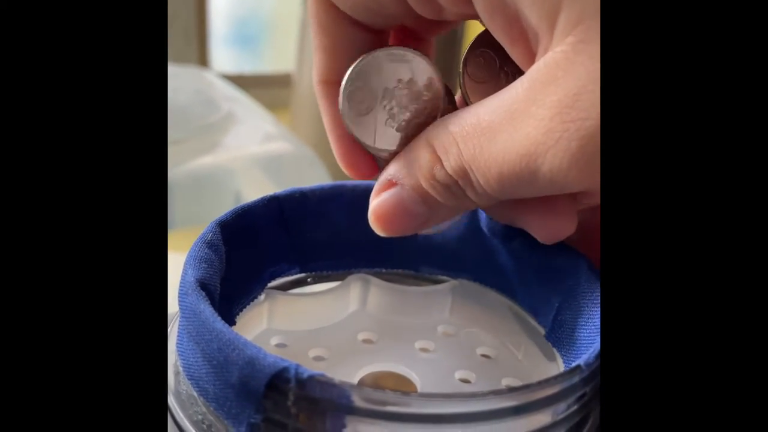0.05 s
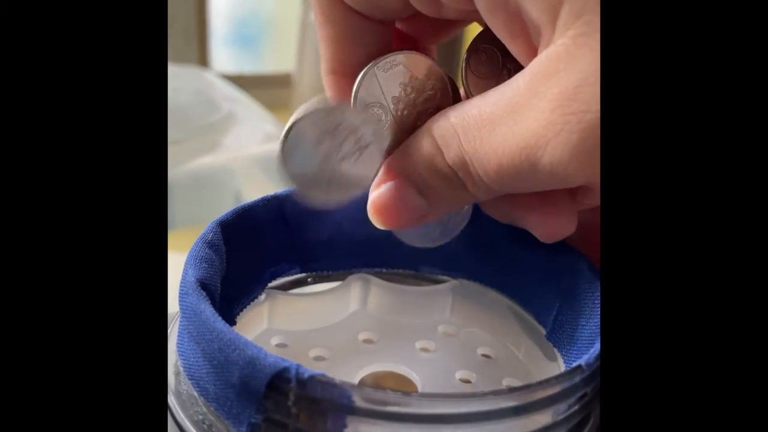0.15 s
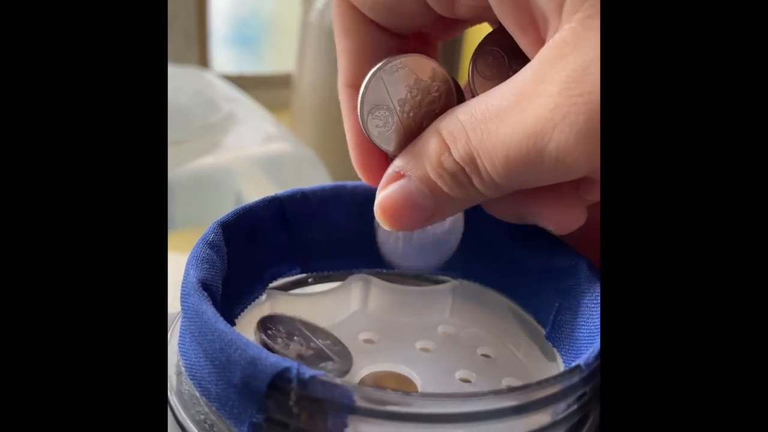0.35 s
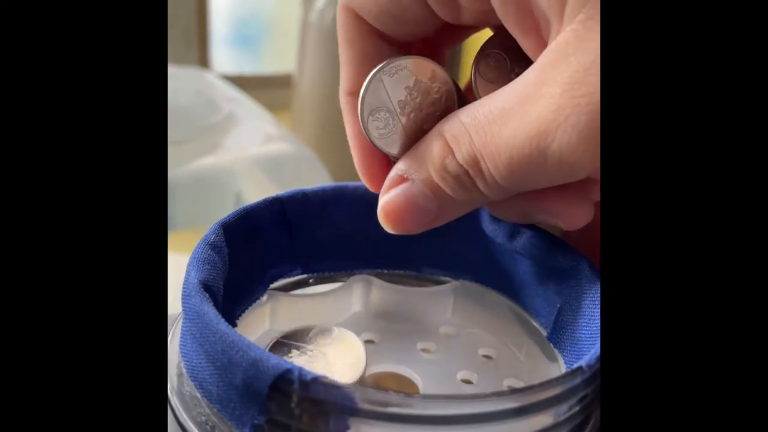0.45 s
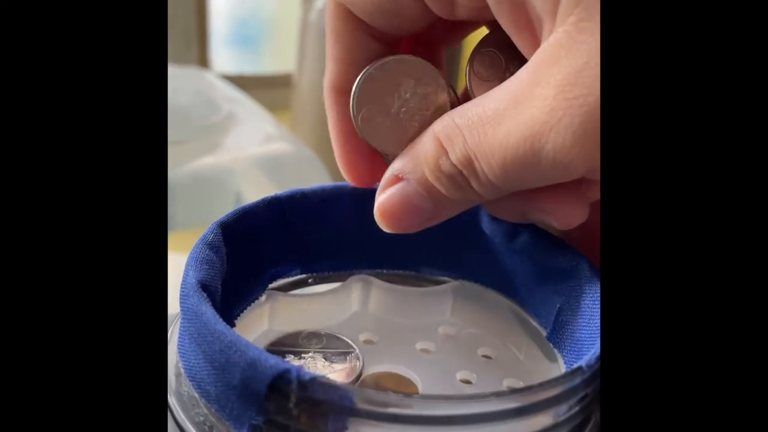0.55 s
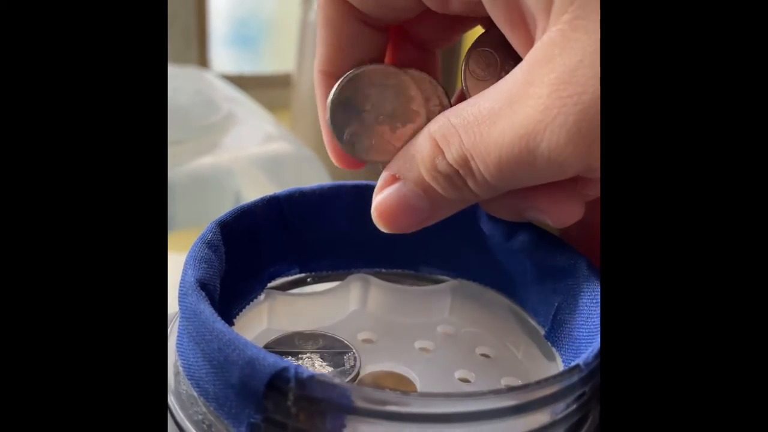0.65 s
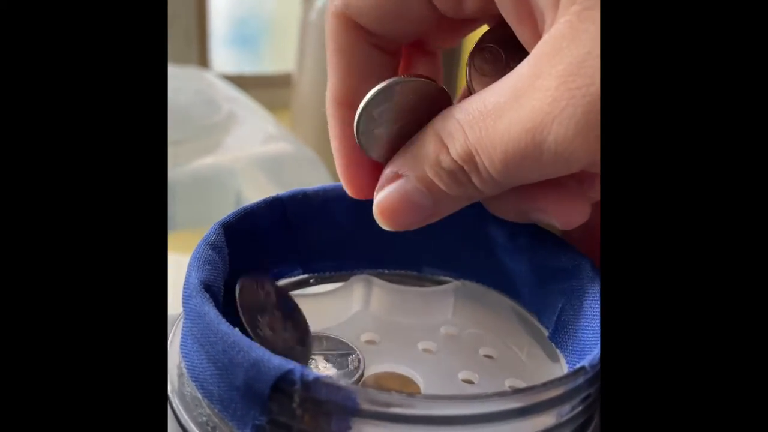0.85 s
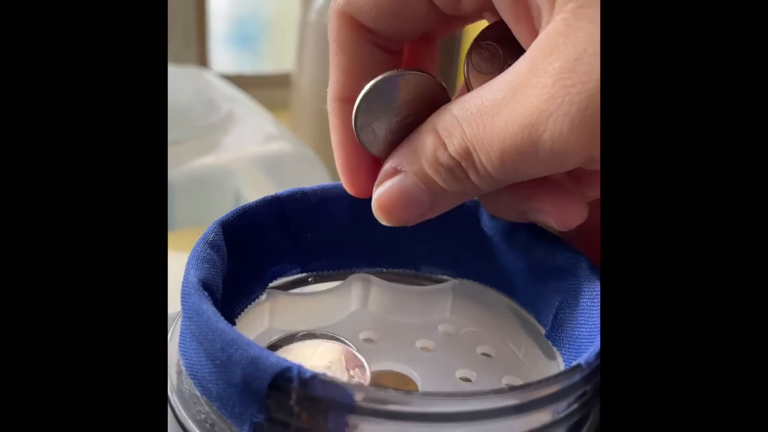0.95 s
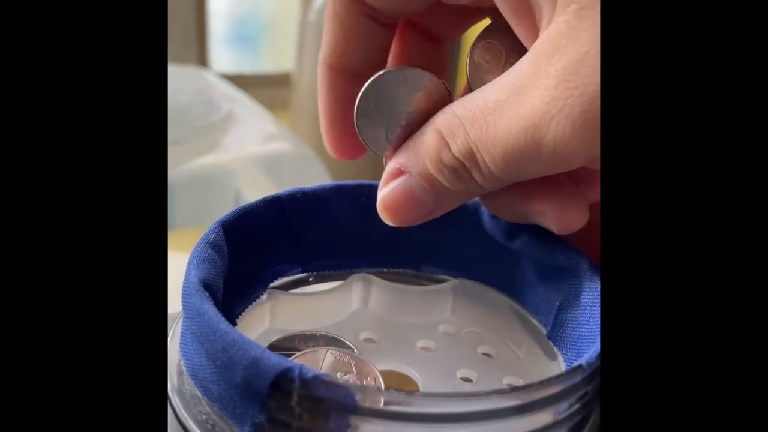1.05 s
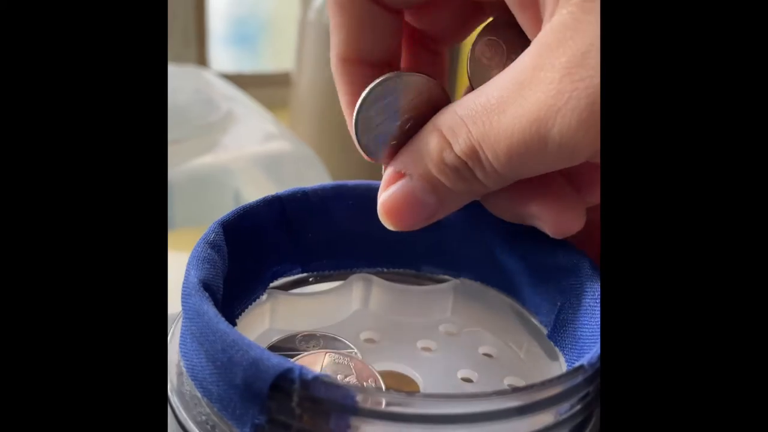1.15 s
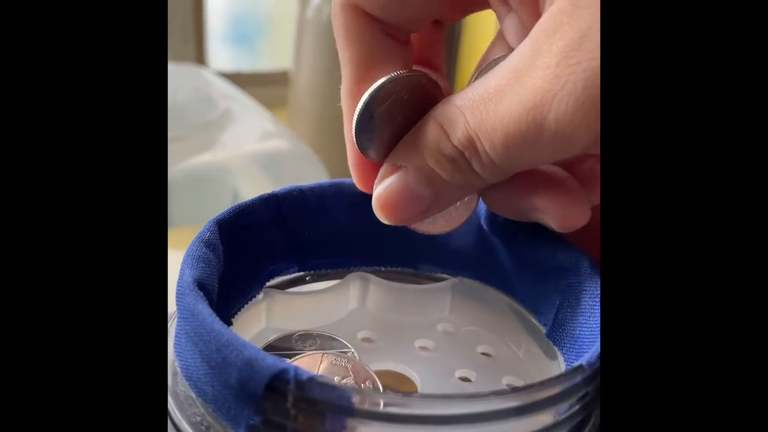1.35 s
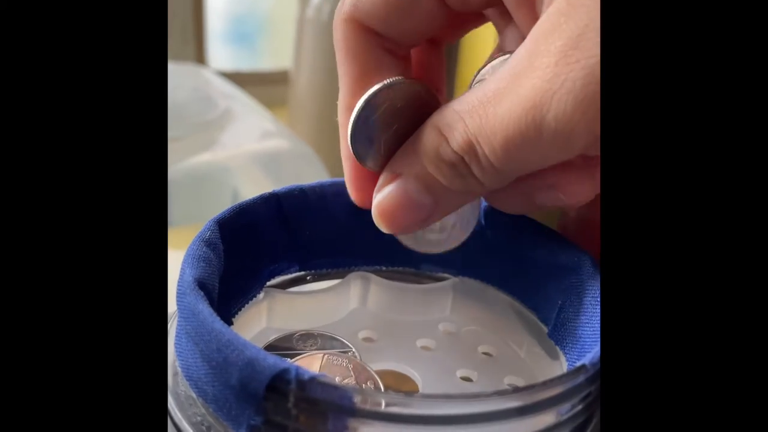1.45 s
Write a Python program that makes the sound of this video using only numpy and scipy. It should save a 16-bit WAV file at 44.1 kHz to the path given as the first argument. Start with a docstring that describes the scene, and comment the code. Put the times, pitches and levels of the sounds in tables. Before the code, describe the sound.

After a brief quiet, a coin hits hollow plastic, bounces and rattles, then another lands with lighter clinks and settles; very close and dry, with faint air hiss and mains hum behind.

```python
"""A quiet room with mains hum, two close microphones at a cloth-rimmed jar: coins drop one after another
onto its hollow plastic insert, bounce, rattle and slide to rest. Each hit rings the insert's decaying
modes and cracks as a noise burst; rattles are dense grains driving the same modes, ticks only crack.
Sliding is fluttering hiss, knocks are dull rings, the air is shaped noise and the hum two sines."""
import sys
import numpy as np
from scipy import signal
from scipy.fft import rfft, irfft
from scipy.io import wavfile

SR = 44100
rng = np.random.default_rng(int(sys.argv[2]) if len(sys.argv) > 2 else 0)


def generate_wav(sig):
    """Save sig (samples, or channels by samples) to the path in sys.argv[1] as 16-bit PCM at SR."""
    pcm = np.round(np.clip(np.atleast_2d(sig).T, -1, 1) * 32767).astype(np.int16)
    wavfile.write(sys.argv[1], SR, pcm)


def natural_amplitude(level_db):
    """Convert a level in decibels to a linear amplitude factor, elementwise."""
    exponent = np.asarray(level_db, float) / 20
    return 10 ** exponent


N = 66150  # 1.5 s

# mains hum: (time [s], fundamental level [dB], octave level before a 3 dB cut [dB])
HUM = [(0, -42.5, -80), (.2, -45.5, -76), (.4, -44, -52.5), (.6, -43, -58), (.85, -47.5, -53),
       (1.0, -49, -53), (1.08, -46.5, -52), (1.5, -52.5, -52)]
HUM_HZ = 61.1
# colour of the room air: (frequency [Hz], density [dB per Hz])
AIR_COLOUR = [(25, -45), (50, 14), (90, 3), (150, 1), (300, 1.5), (650, 2), (1200, -6.5), (3000, -10),
              (5500, -22), (6800, -24), (7600, -54.5), (8500, -24), (10500, -27), (13000, -35),
              (14500, -69), (18000, -67)]
# stereo width of the air: (frequency [Hz], side minus mid [dB])
AIR_SIDE = [(60, -17), (110, -4.5), (200, -19), (380, -5), (700, 1), (1290, 1.5), (2380, 1.5), (4400, 1.7),
            (6300, -4.5), (7600, 26), (8800, 0), (11000, -11), (13500, 3), (16000, 5)]
# slow sway of the air, with a brief dip, on top of AIR_DB: (time [s], level [dB])
AIR_SWAY = [(0, 2.5), (.6, 5.5), (.68, -5), (.74, -3.5), (.85, 7), (1.1, 2.25), (1.5, 2.4)]
AIR_DB = -52.5

# hiss of metal sliding on plastic, before it is doubled: (time [s], level [dB])
SLIDE = [(.02, -69), (.12, -76.5), (.26, -73), (.34, -69), (.45, -50.5), (.56, -99), (.65, -60.5),
         (.72, -59.5), (.79, -59.5), (.86, -69), (.98, -63), (1.05, -69), (1.1, -92)]
# colour of that hiss: (frequency [Hz], density [dB per Hz])
SLIDE_COLOUR = [(590, -21), (1000, -5.5), (2200, 1), (3500, -8), (5500, -9), (7000, -9), (10500, -9),
                (13000, -13), (14200, -20), (17000, -57)]
SLIDE_FLUTTER_DB, SLIDE_FLUTTER_HZ = 6, 39  # rms depth, low-pass corner of the flutter

# coins tick against each other: (time [s], level [dB])
TICKS = [(0.098, -44), (0.126, -39.5), (0.2008, -41), (0.499, -35), (.593, -36), (0.748, -37.5), (.9, -38),
         (0.918, -35), (.925, -45), (0.959, -38), (0.975, -36), (1.003, -37), (1.009, -38), (0.984, -23),
         (1.1179, -28.5), (1.12, -42), (1.15, -41.5), (1.471, -42)]
# sharp contacts; the last five columns are relative to the hit: (time [s], level [dB],
# hollow ring [dB], upper ring [dB], plate ring [dB], crack [dB], boom [dB])
HITS = [(.248, -8, 1, -4, -0.45, -0.5, -7), (.342, -14, -2.5, -7, -7, 2.5, -6),
        (.357, -12, -3.5, -2, 0.7, 8, -11.5), (0.404, -20, -1.5, 6, -3.5, 3, 3),
        (.436, -19, -0.5, -9, -2.3, -3, -9.5), (.551, -22, -24, 8, 1.7, 9, -2.5),
        (.623, -16.5, -7, 3, 0.5, -3, -8), (.806, -14.5, 4, 1, -0.5, 4, -9),
        (.880, -15.5, -0.5, -0.5, 0, 2.7, 1.5), (.949, -18.5, -3, -2.5, -2, 0.5, 3),
        (1.098, -34.5, 3.5, 3, 2.5, 7, 9.5)]
# a coin wobbles or skids in dense small contacts; the last two columns are relative to the level:
# (middle [s], level [dB], half-length [s], hollow ring [dB], crack [dB])
RATTLES = [(0.242, -29.5, 0.0059, -1, 3), (0.347, -19.5, 0.01, 1, -29), (0.364, -13.5, 0.012, -18, -30),
           (.43, -16, 0.0083, 7.5, -3), (0.502, -18, 0.02, -7.5, -6.5), (0.526, -26.5, 0.0046, 4, -29),
           (0.588, -30, 0.015, 1, 9), (0.597, -24.5, 0.023, 7, -31), (0.627, -20, 0.012, -1, 15.5),
           (0.329, -41, 0.012, 18, -19), (0.41, -22, 0.012, 8.5, -18), (0.952, -29.5, 0.0058, 1, 22),
           (0.555, -24, 0.022, -8, -17), (0.695, -33.5, 0.018, -8, 7.5), (0.767, -39.5, 0.028, -2, 1),
           (0.909, -26.5, 0.036, -9, -19), (0.877, -40, 0.012, 4, -13), (0.981, -24, 0.024, -2, -2),
           (1.008, -32, 0.031, -2.5, -17), (1.126, -38, 0.017, 8.5, -20)]
RATTLE_PER_S, RATTLE_SPREAD_DB = 3500, 3

# lowest mode of the insert: (frequency [Hz], level [dB], t60 [s])
BOOM = [(238.5, -13.5, 0.43)]
# hollow modes of the insert: (frequency [Hz], level [dB], t60 [s])
HOLLOW = [(360, -21.5, 0.039), (292, -21, 0.045), (600, -27.5, 0.028), (720, -12.5, 0.065),
          (793.2, -4.5, 0.064)]
# short modes above the hollow ring: (frequency [Hz], level [dB], t60 [s])
UPPER = [(920, -6, 0.027), (963, -7.5, 0.018)]
# plate modes of the insert: (frequency [Hz], level [dB], t60 before the cap below [s])
PLATE = [(1025, -7.5, 0.02), (1420, -12.5, 0.035), (1569, -11.5, 0.034), (1672, -17, 0.033),
         (1867, -9.5, .03), (1960, -8.5, 0.039), (2094, -5, 0.074), (2424, -8.5, 0.035), (2637, -17, 0.055),
         (2718, -4, 0.039), (2824, -12, 0.04), (3190, -13.5, 0.018), (3665, -16.5, 0.035),
         (4287, -21, 0.025), (5320, -18, 0.031), (5850, -18.5, 0.026)]
LONGEST_PLATE_T60_S = .025
HOLLOW_SPREAD_DB, PLATE_SPREAD_DB = -0.5, 3  # strength varies from hit to hit
HOLLOW_DETUNE, PLATE_DETUNE = 0.014, .016  # tuning varies too, as a share of the frequency
HOLLOW_LAG_S, BOOM_LAG_S = 0.001486, 0.00492  # these modes speak late
CONTACT_S = 0.002198  # modes start scattered over this time
DAMP_S = 0.013  # time constant of the fade once the next coin lands
RATTLE_RING_SHARE = .6  # a coin lying on the insert shortens its ring
PLATE_SIDE_DB = -8
BODY_CUT_HZ = 200  # high-pass under the coins

# colour of the cracks: (frequency [Hz], density [dB per Hz])
CRACK = [(590, -35), (1000, -10.5), (2870, -5.5), (4350, -11), (5990, -9.5), (7680, -8.5), (11200, -11),
         (14200, -14.5), (16000, -24), (17000, -53)]
CRACK_DB, CRACK_T60_S = -8, 0.0049
CRACK_TAIL_DB, CRACK_TAIL_T60_S = -15, 0.044
RATTLE_CRACK_DB = -8.5
TAIL_CUT_HZ = 14700
GRIT_FROM_HZ, GRIT_LOW_DB = 9400, -3  # tails, ticks and rattles are cut below, so crack brighter

# dull knocks through the jar, before the push filter: (level [dB], frequency [Hz], t60 [s])
JOLT = [(-27.5, 145, 0.087), (-23.5, 390, 0.084), (-34, 476, 0.071), (-15.5, 300, 0.031),
        (-21.5, 329, 0.042), (-31, 146, 0.14)]
# moments of the knocks, one for each row above: (time [s])
JOLT_S = [.257, .251, .252, .628, .627, .636]
PUSH_HZ = 523  # a soft push holds little above this

# phase gap between the microphones: (frequency [Hz], left leads [radians])
LEAD = [(0, 0), (700, -.4), (1210, -1.1), (1550, .4), (2500, 1.1), (3880, 1.6), (5000, -.4), (6200, -1.8),
        (7000, -3), (8300, -3.25), (9000, -2), (10000, -.2), (11800, .2), (13000, 1.8), (14200, 3),
        (15100, 3.6), (15600, 6), (17000, 6)]
# level gap between the microphones: (frequency [Hz], left minus right [dB])
BALANCE = [(60, 5), (200, -0.5), (380, 0), (700, 4.4), (1290, -2.2), (2380, 0.5), (4400, -3.7),
           (8120, 3.45), (15000, -1.5)]
ROOM_T60_S, ROOM_DB, ROOM_DELAY_S = 0.12, -8.5, 0.0032  # the delay is the swell of the tail
WALL_CUT_HZ, ROOM_WIDE_HZ = 4630, 490  # low-pass of the tail, high-pass of its side
# microphone colour: (frequency [Hz], gain [dB])
MIC = [(20, -2), (6000, 1), (9500, -1.5), (20000, 2.5)]
# the bass drops out after the knocks and returns: (time [s], gain [dB])
BASS_DIP = [(0, 0.5), (.645, -4.5), (.675, -33), (.72, -45), (.79, -9), (.83, -6), (1.5, 1)]
BASS_HZ = 132


def rms_one(x):
    """Scale to rms 1."""
    return x / np.sqrt(np.mean(x ** 2) + 1e-20)


def in_time(rows):
    """Curve columns at every sample."""
    s, *columns = np.transpose(rows)
    return [np.interp(np.arange(N) / SR, s, column) for column in columns]


def at_hz(points, size):
    """A table read on the log-frequency grid of a transform."""
    hz, value = np.transpose(points)
    return np.interp(np.log(np.fft.rfftfreq(size, 1 / SR) + 1), np.log(hz + 1), value)


def colour(x, spectrum):
    """Shape by a spectrum; white noise of rms 1 keeps rms 1."""
    gain = natural_amplitude(at_hz(spectrum, N))
    return irfft(rfft(x) * rms_one(gain), N)


def passed(x, order, hz, kind="low"):
    """Butterworth low-pass or high-pass."""
    return signal.sosfilt(signal.butter(order, hz, kind, fs=SR, output="sos"), x)


def below(x, order, hz):
    """The part of a sound below a corner, with no phase shift."""
    return signal.sosfiltfilt(signal.butter(order, hz, fs=SR, output="sos"), x)


def clicks(s, db):
    """Single-sample impulses."""
    out = np.zeros(N)
    at = np.clip((np.asarray(s) * SR).astype(int), 0, N - 1)
    np.add.at(out, at, natural_amplitude(db))
    return out


def ring(x, hz, t60):
    """A unit click sets a decaying sine of starting height 1 ringing."""
    r, w = natural_amplitude(-60 / (t60 * SR)), 2 * np.pi * hz / SR
    return signal.lfilter([0, np.sin(w)], [1, -2 * r * np.cos(w), r * r], x + 1e-18)


def fade(x, t60):
    """Each click starts an exponential envelope."""
    return signal.lfilter([1], [1, -natural_amplitude(-60 / (t60 * SR))], x + 1e-18)


def background():
    """Room air as shaped noise, its width varying with frequency, and mains hum as two sines."""
    mid, side = rng.standard_normal((2, N))
    side = irfft(rfft(side) * natural_amplitude(at_hz(AIR_SIDE, N)), N)
    sway_db, = in_time(AIR_SWAY)
    air = natural_amplitude(AIR_DB + sway_db) * colour(np.array([mid + side, mid - side]), AIR_COLOUR)
    first_db, second_db = in_time(HUM)
    turn = 2 * np.pi * HUM_HZ * np.arange(N) / SR
    hum = natural_amplitude(first_db) * np.sin(turn) + natural_amplitude(second_db - 3) * np.sin(2 * turn)
    return air + np.sqrt(2) * hum


def slide():
    """Fine, uneven scraping of coins on plastic: coloured noise with a random flutter."""
    lead_in, fade_out = (SLIDE[0][0] - .02, -110), (SLIDE[-1][0] + 0.14, -110)
    level_db, = in_time([lead_in] + list(SLIDE) + [fade_out])
    flutter = rms_one(passed(rng.standard_normal(N), 2, SLIDE_FLUTTER_HZ))
    hiss = colour(rng.standard_normal(N), SLIDE_COLOUR)
    return natural_amplitude(level_db + SLIDE_FLUTTER_DB * flutter) * 2 * hiss


def bumps(db):
    """Bell-shaped envelopes of the rattles."""
    t = np.arange(N) / SR
    return sum(natural_amplitude(g) * np.exp(-2 * ((t - row[0]) / row[2]) ** 2) for row, g in zip(RATTLES, db))


def rattle_grains():
    """Random tiny contacts of either sign and uneven strength, with energy 1 per 10 ms."""
    present = rng.random(N) < RATTLE_PER_S / SR
    sign = rng.choice([-1, 1], N)
    strength = natural_amplitude(RATTLE_SPREAD_DB * np.minimum(rng.exponential(1, N), 3))
    grains = present * sign * strength
    return grains / np.sqrt(np.sum(grains ** 2) / (N / SR * 100))


def struck(modes, hit_db, drive, lag_s, detune, spread_db):
    """Each hit rings every mode at its own moment, strength and tuning, damped once the next lands;
    the drive excites the same modes densely."""
    s, out = np.array(HITS)[:, 0], np.zeros(N + SR)
    hz, level_db, t60 = np.transpose(modes)[:, :, None]
    sign = (-1.) ** np.arange(len(modes))[:, None]
    t = np.arange(SR // 2) / SR
    for start, until, db in zip(s, np.diff(s, append=N), hit_db):  # the last hit rings undamped
        when = rng.random(hz.shape)
        how = np.clip(rng.standard_normal(hz.shape), -2, 1.5)
        shift = rng.uniform(-0.74, 1, hz.shape)
        age = np.maximum(t - lag_s - CONTACT_S * when, 0)
        height = sign * natural_amplitude(db + level_db + spread_db * how - 60 * age / t60)
        rings = height * np.sin(2 * np.pi * hz * (1 + detune * shift) * age)
        at = int(start * SR)
        out[at:at + len(t)] += rings.sum(0) * np.exp(-np.maximum(t - until, 0) / DAMP_S)
    driven = sum((-1) ** k * natural_amplitude(g) * ring(drive, f, d * RATTLE_RING_SHARE)
                 for k, (f, g, d) in enumerate(modes))
    return out[:N] + driven


def capped(modes):
    """Limit the decay times of modes to the longest plate ring."""
    return np.minimum(modes, [SR, 0, LONGEST_PLATE_T60_S])


def insert_rings(grains):
    """Hits and rattles set the hollow, plate and upper modes ringing; only hits sound the boom."""
    _, db, hollow, upper, plate, _, boom = np.transpose(HITS)
    _, r_db, _, r_hollow, _ = np.transpose(RATTLES)
    rattle = grains * bumps(r_db)
    hollow_rattle = grains * bumps(r_db + r_hollow)
    out = struck(HOLLOW, db + hollow, hollow_rattle, HOLLOW_LAG_S, HOLLOW_DETUNE, HOLLOW_SPREAD_DB)
    out = out + struck(capped(PLATE), db + plate, rattle, 0, PLATE_DETUNE, PLATE_SPREAD_DB)
    out = out + struck(UPPER, db + upper, rattle, HOLLOW_LAG_S, PLATE_DETUNE, HOLLOW_SPREAD_DB)
    return out + struck(BOOM, db + boom, np.zeros(N), BOOM_LAG_S, 0, 0)


def cracks(grains):
    """Contact noise: short bursts for hits, ticks and rattle grains, a longer tail on hits and ticks."""
    s, db, _, _, _, crack, _ = np.transpose(HITS)
    _, r_db, _, _, r_crack = np.transpose(RATTLES)
    blows, ticks = clicks(s, db + crack + CRACK_DB), clicks(*np.transpose(TICKS))
    tails = natural_amplitude(CRACK_TAIL_DB) * fade(blows + ticks, CRACK_TAIL_T60_S)
    rattles = natural_amplitude(RATTLE_CRACK_DB) * fade(np.abs(grains) * bumps(r_db + r_crack), CRACK_T60_S)
    envelope = tails + rattles + fade(ticks, CRACK_T60_S)
    grit = passed(envelope * rng.standard_normal(N), 6, TAIL_CUT_HZ)
    grit = grit + (natural_amplitude(GRIT_LOW_DB) - 1) * below(grit, 2, GRIT_FROM_HZ)
    sharp = fade(blows, CRACK_T60_S) * rng.standard_normal(N)
    return colour(grit + sharp, CRACK)


def coins():
    """Hits and rattles ring the insert and crack; ticks only crack."""
    grains = rattle_grains()
    return passed(insert_rings(grains) + cracks(grains), 4, BODY_CUT_HZ, "high")


def plate_side():
    """Another mix of the upper and plate modes, opposite at the two microphones."""
    _, db, _, _, plate, _, _ = np.transpose(HITS)
    modes = capped(UPPER + PLATE)
    rings = struck(modes, db + plate, np.zeros(N), 0, PLATE_DETUNE, PLATE_SPREAD_DB)
    return natural_amplitude(PLATE_SIDE_DB) * rings * [[1], [-1]]


def jolt():
    """Dull knocks through the jar: low rings softened by a one-pole low-pass."""
    knocks = sum(ring(clicks([s], db), hz, t60) for s, (db, hz, t60) in zip(JOLT_S, JOLT))
    r = np.exp(-2 * np.pi * PUSH_HZ / SR)
    return signal.lfilter([1 - r], [1, -r], knocks)


def two_mics(x):
    """The near sound reaches the microphones with a level and phase gap, split evenly between them."""
    turn = natural_amplitude(at_hz(BALANCE, N) / 2) * np.exp(.5j * at_hz(LEAD, N))
    return irfft(rfft(x) * np.array([turn, 1 / turn]), N)


def room(x):
    """Diffuse tail: dying noise, dull, alike on both sides in the bass."""
    t = np.arange(SR // 2) / SR
    noise = rng.standard_normal((2, len(t)))
    mid, side = noise * natural_amplitude(-60 * t / ROOM_T60_S) * np.minimum(t / ROOM_DELAY_S, 1) ** 2
    side = passed(side, 1, ROOM_WIDE_HZ, "high")
    tail = np.array([mid + side, mid - side]) / np.sqrt(2 * np.sum(mid ** 2))
    tail = passed(tail, 2, WALL_CUT_HZ)
    return natural_amplitude(ROOM_DB) * signal.fftconvolve(x[None], tail, axes=1)[:, :N]


def scene():
    """Near coins, their room, the knocks and the background."""
    near = coins() + slide()
    return two_mics(near) + plate_side() + room(near) + jolt() + background()


def roll_off(x):
    """The treble ends steeply here."""
    return signal.sosfilt(signal.butter(12, 17140, fs=SR, output="sos"), x)


def record(dry):
    """Microphone colour, then a passing dip in the bass."""
    x = irfft(rfft(dry) * natural_amplitude(at_hz(MIC, N)), N)
    dip_db, = in_time(BASS_DIP)
    mix = x + (natural_amplitude(dip_db) - 1) * below(x, 1, BASS_HZ)
    return roll_off(mix)


dry = scene()
out = record(dry)
generate_wav(out)
```